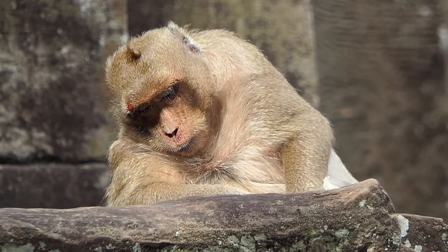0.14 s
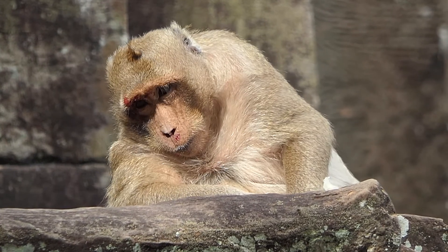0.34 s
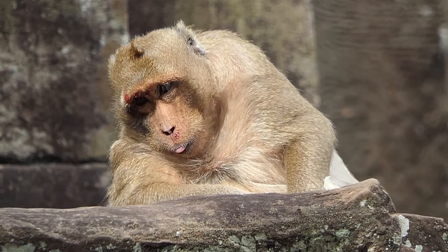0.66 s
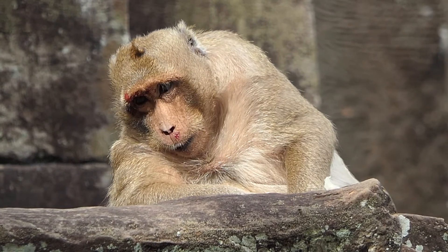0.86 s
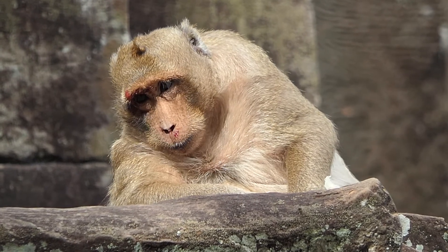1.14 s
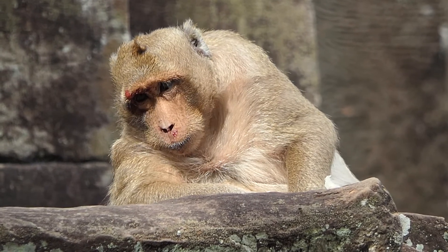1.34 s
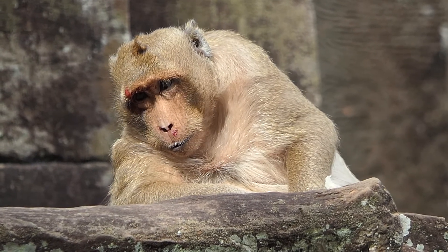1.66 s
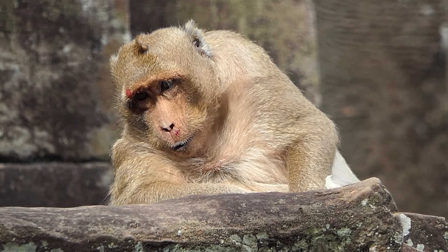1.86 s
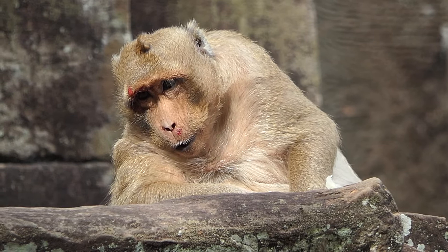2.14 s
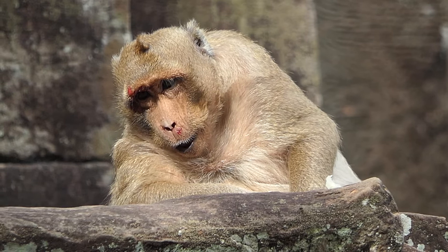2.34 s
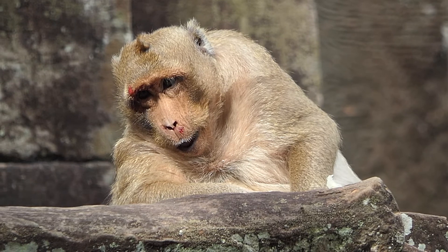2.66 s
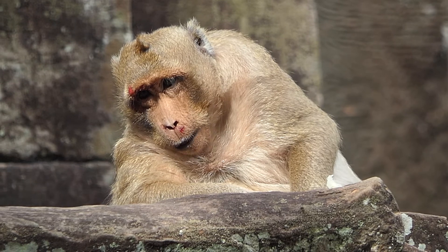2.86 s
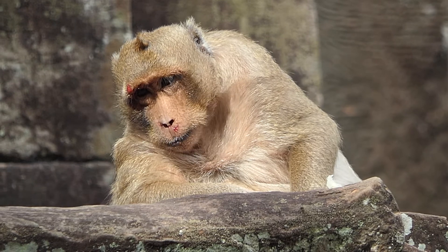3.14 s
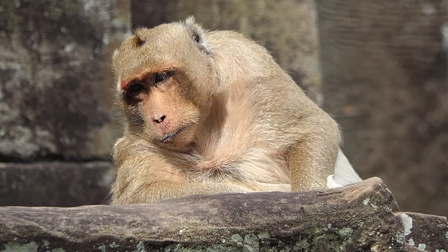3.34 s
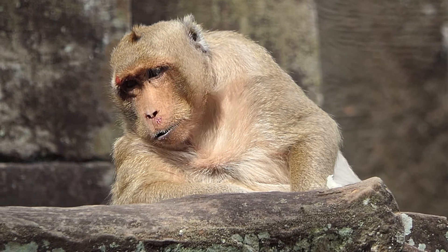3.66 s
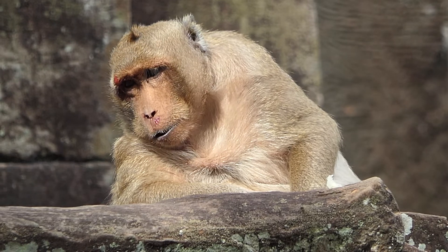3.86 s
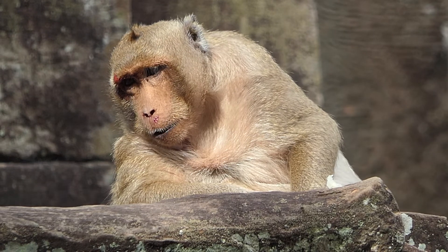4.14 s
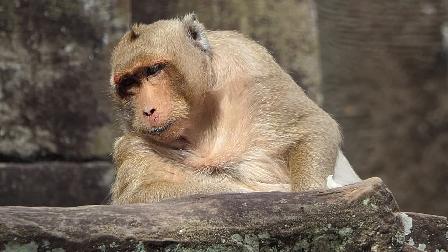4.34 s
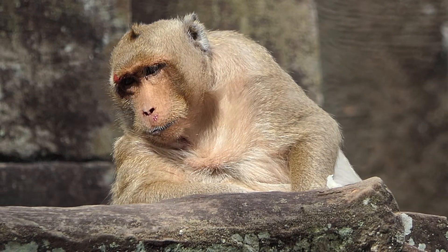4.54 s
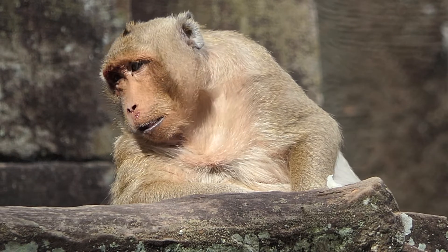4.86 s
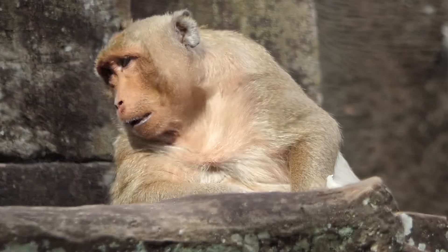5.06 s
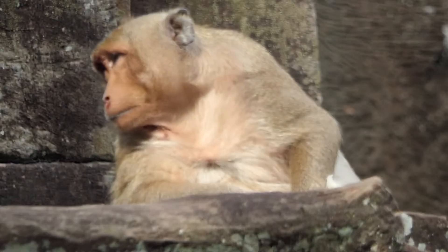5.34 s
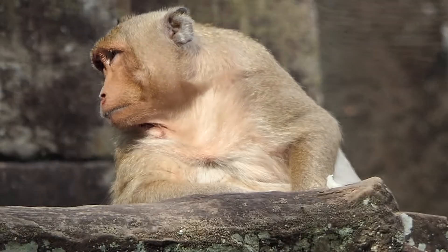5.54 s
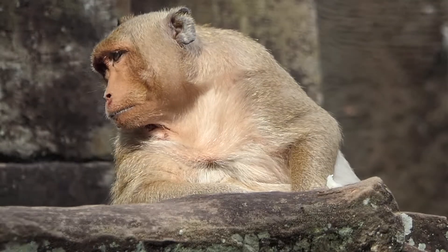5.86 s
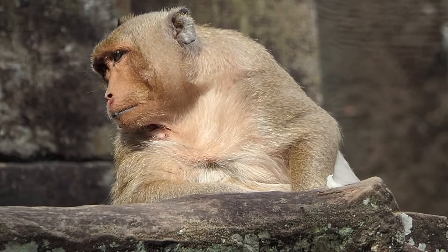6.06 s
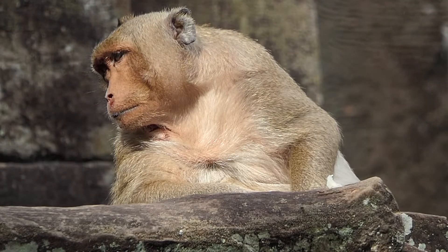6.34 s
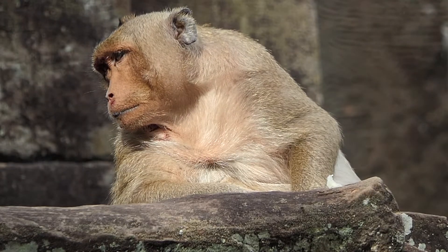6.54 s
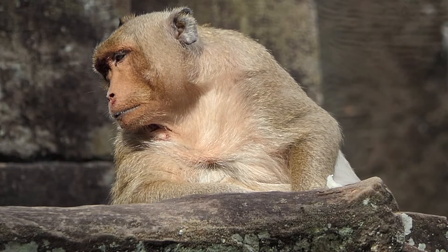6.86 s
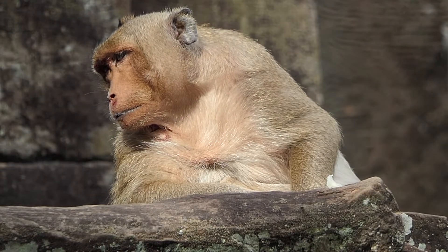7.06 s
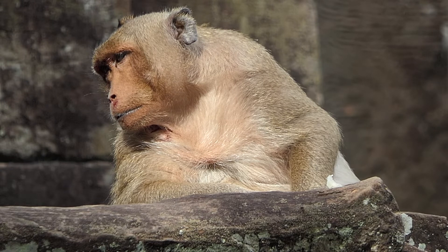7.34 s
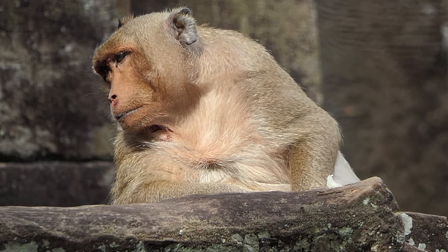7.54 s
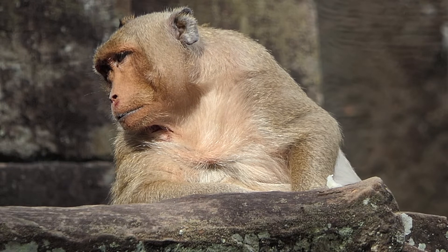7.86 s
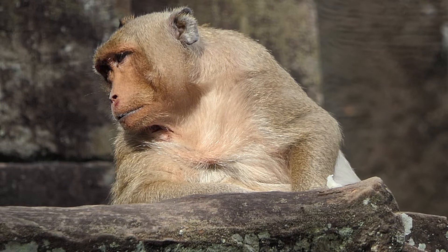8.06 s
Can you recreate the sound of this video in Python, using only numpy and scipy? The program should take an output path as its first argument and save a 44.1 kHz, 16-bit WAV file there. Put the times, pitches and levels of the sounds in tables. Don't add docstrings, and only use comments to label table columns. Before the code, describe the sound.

Quiet close stereo microphones above a stone ledge pick up dry leaf crackle, ticks and faint knocks, strongest between two and three seconds. Behind lies a low wavering engine hum and soft far air. Pure, high bird whistles dip and rise again and again, blurred by a long wall echo, while distant insect and bird trills swell as shrill bands. Short sagging dove-like notes precede a final louder call and hidden, falling replies.

```python
import sys
import numpy as np
from scipy import signal
from scipy.fft import rfft, irfft, next_fast_len
from scipy.io import wavfile
from scipy.ndimage import uniform_filter1d

SR = 44100
rng = np.random.default_rng(int(sys.argv[2]) if len(sys.argv) > 2 else 0)


def rack_gain(trim_db):
    fader = np.asarray(trim_db, float)
    return 10 ** (fader / 20)


def put_to_file(sound):
    columns = np.atleast_2d(sound).T
    safe = np.clip(columns, -1, 1)
    whole_steps = np.round(safe * 32767)
    wavfile.write(sys.argv[1], SR, whole_steps.astype(np.int16))


N = 361619
T = np.arange(N) / SR
NFFT = next_fast_len(N + 2 * SR)
HZ = np.arange(NFFT // 2 + 1) * SR / NFFT + 1e-9


def level(x, rms_db):
    return x * rack_gain(rms_db) / np.sqrt(np.mean(x ** 2))


def colour(points):
    hz, db = np.transpose(points)
    return rack_gain(np.interp(np.log(HZ), np.log(hz), db))


def shape(x, gain):
    return irfft(rfft(x, NFFT) * gain, NFFT)[..., :N]


def hump(hz, width_hz):
    return np.exp(-2 * ((HZ - hz) / width_hz) ** 2)


def swell(start_s, length_s):
    return np.sin(np.pi * np.clip((T - start_s) / length_s, 0, 1))


def walk(rate_hz):
    k = int(SR / rate_hz)
    held = np.repeat(rng.standard_normal(N // k + 1), k)
    return uniform_filter1d(uniform_filter1d(held, k), k)[:N] * 4 / 3


def fading(t60_s, length, rise_s=0.):
    t = np.arange(1, length + 1) / SR
    decay = np.exp(-np.log(1000) * t / max(t60_s, 1e-3))
    tail = rng.standard_normal(length) * decay * t / (t + rise_s)
    return tail / np.sqrt(np.sum(tail ** 2))


def distance(points, rms_db, flicker_db, rate_hz):
    source = rfft(rng.standard_normal((2, NFFT))) * colour(points)
    lowest = np.floor(np.log2(points[0][0]))
    highest = np.log2(points[-1][0])
    out = 0
    for octave in np.arange(lowest, highest + .5, .5):
        band = np.cos(np.pi * np.clip(np.log2(HZ) - octave, -.5, .5)) ** 2
        out = out + irfft(source * band, NFFT)[:, :N] * rack_gain(flicker_db * walk(rate_hz))
    return level(out, rms_db)


# (frequency [Hz], level [dB])
HUM_SPECTRUM = [(13, -63), (22, -43), (43, -25), (108, -2), (134, 2.5), (163, -1), (210, -8), (306, -12.5),
                (407, -25), (452, -27), (525, -15.5), (610, -25), (709, -30.5), (800, -25), (1040, -41),
                (1760, -120)]
# (time [s], level [dB])
HUM_LEVEL = [(0.0, -56.5), (0.07, -54.5), (0.18, -53.5), (3.04, -52), (3.36, -57.5), (3.59, -53.5),
             (3.86, -55), (5.14, -52), (5.16, -56.5), (5.32, -53), (6.46, -52), (6.55, -56.5), (6.6, -53),
             (6.69, -58), (6.74, -51.5), (7.22, -55.5), (7.65, -53), (7.67, -53), (7.83, -53), (8.2, -56.5)]


def engine_hum():
    hum = distance(HUM_SPECTRUM, -0.17, flicker_db=1.5, rate_hz=4.3)
    return hum * rack_gain(np.interp(T, *np.transpose(HUM_LEVEL)))


# (frequency [Hz], density [dB per Hz])
AIR_SPECTRUM = [(380, -65), (650, -9), (713, -14), (981, 5), (1210, -3.5), (1400, -2), (1930, -6),
                (2390, -4), (3800, -10.5), (5020, -1), (5960, -1.5), (8410, -15.5), (10100, -10.5),
                (14700, -27.5), (15500, -17)]


def far_air():
    ledge = np.abs(1 + .35 * rfft(fading(.06, 4096), NFFT))
    return shape(distance(AIR_SPECTRUM, -57, flicker_db=1.77, rate_hz=6), ledge)


# (time [s], length [s], centre [Hz], width [Hz], level [dB])
TRILL_BANDS = [(-.2, 0.58, 5670, 1800, -55.5), (.4, 0.27, 5320, 500, -59), (1.98, 0.34, 4200, 300, -58.5),
               (2.98, 0.3, 4700, 500, -65), (3.42, 0.56, 5350, 500, -58), (4.39, 0.064, 10500, 900, -58.5),
               (5.42, 0.29, 5280, 397, -57.5), (5.967, 0.11, 2330, 150, -64.5),
               (6.175, 0.11, 5350, 500, -62), (8.07, .06, 12300, 300, -68), (4.415, 0.33, 10500, 1200, -67),
               (5.62, 0.51, 840, 300, -58), (7.5, 0.029, 604, 200, -53), (7.698, 0.35, 11500, 895, -80),
               (7.904, 0.33, 5000, 1500, -52)]


def trills(throb_db=1.5):
    noise, throb = rng.standard_normal(N), rack_gain(throb_db * walk(35))
    out = np.zeros(N)
    for s, length_s, hz, width_hz, db in TRILL_BANDS:
        out += swell(s, length_s) * level(shape(noise, hump(hz, width_hz)), db)
    return throb * out


# (frequency [Hz], level [dB])
LEAF_SPECTRUM = [(500, -12.5), (1000, -1.5), (2000, 2), (4000, 5.5), (7000, -9), (10000, -5.5),
                 (13000, -15.5), (16000, -14)]
# (time [s], 8-11 kHz level [dB],
# then relative to it: over 12 kHz [dB], 2-4 kHz [dB], under 2 kHz [dB])
STIRRING = [(0.0, -54.5, -20, -3, -7), (0.18, -58, -9, 0.5, -6), (0.32, -62.5, -10, 3.5, -1),
            (0.48, -59, -11, 1.5, -1), (0.52, -62, -12, 7.5, 4), (0.64, -65.5, -6.5, 0, -1),
            (0.77, -67.5, -1, 6.5, 2), (1.05, -63, -9.5, 1.5, 5.5), (1.14, -66.5, -7, 3, -8),
            (1.44, -64, -14, -5, 0), (1.51, -70, -8, 1, 14), (1.57, -65, -8, -8, -6),
            (1.71, -69.5, -3, 4, -1), (1.92, -60.5, -4, 2, 1), (1.96, -64, -6, 0, 4),
            (1.98, -54, -18, -2, 1), (2.01, -51, -18, -5.5, -5), (2.1, -56, -11, 1.5, -3),
            (2.19, -53.5, -12, 3.5, 0), (2.24, -59, -11, 5, -2), (2.33, -74.5, -9, 10, 14.5),
            (2.44, -69, -10, 5.5, 7), (2.51, -67.5, -3, 4, 10), (2.6, -58, -8, -1, 0),
            (2.65, -50.5, -7, 0, -1.5), (2.69, -50.5, -11, -4, -3.5), (2.72, -53, -8, 5, 6.5),
            (2.74, -52, -10, -1.5, -2), (2.85, -56.5, -8, -0.5, 0), (3.24, -69.5, -11, 6.5, 8.5),
            (3.29, -61.5, -10, 2.5, 5), (3.36, -68.5, -9, -10, 9), (3.45, -68, -13, 0, 6.5),
            (3.68, -67, -11, 1, 1), (3.72, -67, -12, 5, 12), (3.75, -63.5, -9, -1, 3),
            (3.97, -72, -8, 4, 9.5), (4.39, -66, -5.5, 0, 10), (4.41, -66, -17, -2, 0),
            (4.43, -61.5, -16, 1, 6), (4.45, -66.5, -5, 6, 9.5), (4.93, -81, 0, 5, 17),
            (4.96, -75, -7, 9, 9), (4.98, -58.5, -14, -7, -3.5), (5.07, -75, -7, 8, 11),
            (5.14, -69, -9, 3, 6), (5.16, -58.5, -15, 2, -10), (5.21, -56, -10, -10, -9),
            (5.23, -58, -11, -2, -6), (5.3, -56.5, -11, -13, -5), (5.32, -61.5, -8, 1, 1),
            (5.37, -57, -11, -2, -7), (5.39, -59, -9, -3, -3), (5.64, -63, -20, -6, 5.5),
            (5.66, -64.5, -5, 9, 8), (5.73, -61.5, -13, -4, -1.5), (5.98, -64, -16.5, 1.5, 6),
            (6.39, -70, -14, 5, 10.5), (6.44, -62, -7, 3, 4), (6.48, -56, -18, -4.5, 1),
            (6.69, -68.5, -15, 7, 7), (7.12, -60.5, -19, -2.5, -4), (7.15, -67, -11, 3.5, 9),
            (7.58, -66.5, -5, 4.5, -3), (7.99, -67.5, -9.5, 8, 9), (8.09, -57, -14, 0, 0.5),
            (8.2, -59.5, -19, 0, 0.5)]


def rustle(trim_db=-1.5, crunch_trim_db=-3.0, dull_trim_db=-1.5):
    s, db, hiss_db, dull_db, crunch_db = np.transpose(STIRRING)
    sizes = rack_gain(1.3 * rng.exponential(size=N)) * rack_gain(.9 * walk(40))
    cracks = rng.standard_normal((2, N)) * sizes
    low, middle, high = (1 / (1 + (HZ / hz) ** 8) for hz in (1850, 5000, 11800))
    parts = [(low, crunch_db + crunch_trim_db),
             (middle - low, dull_db + dull_trim_db),
             (high - middle, 0),
             (1 - high, hiss_db)]
    out = 0
    for share, rel_db in parts:
        band = level(shape(cracks, colour(LEAF_SPECTRUM) * share), trim_db)
        out = out + band * rack_gain(np.interp(T, s, db + rel_db))
    return out


def taps(events, t60_s, spread):
    out = np.zeros(N)
    for s, peak_db, hz in events:
        edges_hz = np.clip([hz / spread, hz * spread], 50, .45 * SR)
        band = signal.butter(2, edges_hz, "band", fs=SR, output="sos")
        burst = signal.sosfilt(band, fading(t60_s, 2048))
        i = int(s * SR)
        out[i:i + 2048] += rack_gain(peak_db) * burst / np.abs(burst).max()
    return out


# (time [s], peak level [dB], centre [Hz])
LEAF_TICKS = [(0.4423, -38, 5170), (0.5964, -51, 5230), (0.9737, -40, 5410), (1.9804, -41, 5350),
              (2.0123, -29.5, 6820), (2.6379, -42.5, 6060), (2.9294, -40, 5140), (3.2705, -42, 5670),
              (4.4004, -42.5, 5430), (4.4184, -60, 10200), (4.6638, -55, 10000), (4.9841, -58, 5950),
              (5.1961, -51, 5580), (5.2862, -39, 5970), (5.3632, -43, 5710), (5.8082, -44, 5430),
              (5.9094, -43, 6110)]


def ticks():
    return taps(LEAF_TICKS, t60_s=0.0099, spread=1.6)


# (time [s], peak level [dB], centre [Hz])
TWIG_KNOCKS = [
    (0.426, -41.5, 2410),
    (0.775, -43, 3020),
    (0.834, -43, 2240),
    (1.772, -45, 1010),
    (2.711, -41.5, 1040),
    (3.701, -50, 1450),
    (4.333, -43, 964),
    (4.784, -46, 1110),
    (7.51, -43, 1390),
    (7.751, -46, 2220),
]


def knocks():
    return taps(TWIG_KNOCKS, t60_s=0.013, spread=1.26)


# (time [s], peak level [dB], centre [Hz])
TWIG_SNAPS = [
    (2.647, -36, 2500),
    (2.663, -30.5, 2490),
    (3.722, -35.5, 2500),
    (3.773, -46, 2500),
    (4.418, -40, 2500),
]


def snaps():
    return taps(TWIG_SNAPS, t60_s=0.011, spread=2.5)


# (time [s], peak level [dB], pitch [Hz], length [s])
COO_NOTES = [
    (5.544, -59, 585, 0.025),
    (5.582, -56, 537, 0.029),
    (5.645, -57, 922, 0.032),
    (5.77, -48, 780, 0.025),
    (5.847, -53, 870, 0.03),
    (5.896, -48, 760, 0.029),
    (5.981, -55.5, 872, 0.039),
    (6.029, -51, 830, 0.031),
]


def coos(sag_per_s=0.71, boost_db=-2):
    out = np.zeros(N)
    for s, db, hz, length_s in COO_NOTES:
        t = T - s
        out += rack_gain(db + boost_db) * swell(s, length_s) * np.sin(2 * np.pi * hz * t * (1 - sag_per_s * t))
    return out


def grove(x, in_sight):
    paths = in_sight * fading(.07, 2 * SR, rise_s=.002)
    paths = paths + rack_gain(-4.5) * fading(0.29, 2 * SR, rise_s=0.0036)
    paths = paths + rack_gain(1.5) * fading(1.33, 2 * SR, rise_s=0.012)
    return in_sight * rack_gain(-9) * x + shape(x, rfft(paths, NFFT))


def whistle(call, flutter):
    s, hz, db = np.transpose(call)
    out, on = np.zeros(N), (T > s[0]) & (T < s[-1])
    t = T[on]
    edges = np.clip(np.minimum(t - s[0], s[-1] - t) / .007, 0, 1)
    phase = 2 * np.pi * np.cumsum(np.interp(t, s, hz)) / SR
    out[on] = rack_gain(np.interp(t, s, db)) * edges * np.sin(phase)
    return out * flutter


# (time [s], pitch [Hz], level [dB])
CALLS = [
    [(1.08, 6840, -47), (1.11, 6230, -44), (1.145, 5600, -52.5), (1.18, 4820, -54), (1.235, 5910, -46.5),
     (1.27, 6400, -49.5), (1.295, 7400, -50.5)],
    [(1.735, 6350, -51.5), (1.79, 5900, -62), (1.83, 5260, -51.5), (1.87, 5600, -64), (1.91, 7000, -72)],
    [(2.41, 6850, -44.5), (2.445, 6000, -43), (2.48, 5600, -49), (2.515, 4800, -56), (2.56, 5570, -45),
     (2.59, 6460, -47), (2.62, 7300, -55)],
    [(3.728, 7020, -49.5), (3.765, 6150, -44.5), (3.80, 5600, -49), (3.835, 4820, -54.5), (3.87, 5600, -46),
     (3.91, 6430, -48.5), (3.947, 7600, -53)],
    [(4.928, 6700, -49), (4.955, 6200, -44.5), (4.99, 5600, -54), (5.03, 4850, -60), (5.072, 5650, -43.5),
     (5.10, 6100, -48), (5.14, 7350, -54)],
    [(6.34, 7220, -54.5), (6.375, 6070, -46.5), (6.40, 5680, -46), (6.43, 4900, -52.5), (6.475, 5500, -51),
     (6.51, 6000, -46), (6.55, 7350, -52)],
    [(7.333, 5680, -50), (7.343, 6200, -41.5), (7.39, 5710, -39), (7.435, 5050, -41), (7.48, 5710, -34.5),
     (7.515, 6990, -43.5)],
]
# (time [s], pitch [Hz], level [dB])
HIDDEN_CALLS = [
    [(7.57, 6900, -49), (7.605, 6000, -46), (7.65, 4850, -56), (7.70, 5600, -49), (7.755, 7350, -48)],
    [(7.865, 6000, -46), (7.89, 5100, -41), (7.925, 4050, -55), (7.98, 4700, -60), (8.02, 5900, -54)],
    [(8.01, 5200, -52), (8.06, 3900, -65), (8.11, 5000, -54)],
]


def whistles(flutter_db=2.5):
    flutter = rack_gain(flutter_db * walk(120))
    seen = sum(grove(whistle(call, flutter), in_sight=0.92) for call in CALLS)
    hidden = sum(whistle(call, flutter) for call in HIDDEN_CALLS)
    return seen + grove(hidden, in_sight=0.59)


# (frequency [Hz], side minus mid [dB])
PORT_DIFFERENCE = [(30, -16), (60, -16), (120, -39), (300, -16.5), (2000, -16.5), (6000, -14.5),
                   (8000, -10), (10000, -6), (14000, -1)]


def scene():
    wide, other = engine_hum() + far_air() + rustle()
    clicks = ticks() + knocks() + snaps()
    mid = wide + clicks + whistles() + coos() + trills()
    side = shape(other + clicks + 0.15 * mid, colour(PORT_DIFFERENCE))
    return np.array([mid + side, mid - side])


def roll_off(x):
    return signal.sosfilt(signal.butter(12, 15640, fs=SR, output="sos"), x)


# (centre [Hz], width [Hz], depth [0-1])
HOUSING_DIPS = [(1840, 78, 0.24), (3190, 110, 0.16), (4700, 83, 0.48), (7500, 180, 0)]


def record(dry):
    dents = np.prod([1 - depth * hump(hz, width_hz) for hz, width_hz, depth in HOUSING_DIPS], axis=0)
    mix = shape(dry, dents / (1 + (HZ / 15700) ** 80))
    return roll_off(mix)


dry = scene()
out = record(dry)
put_to_file(out)
```